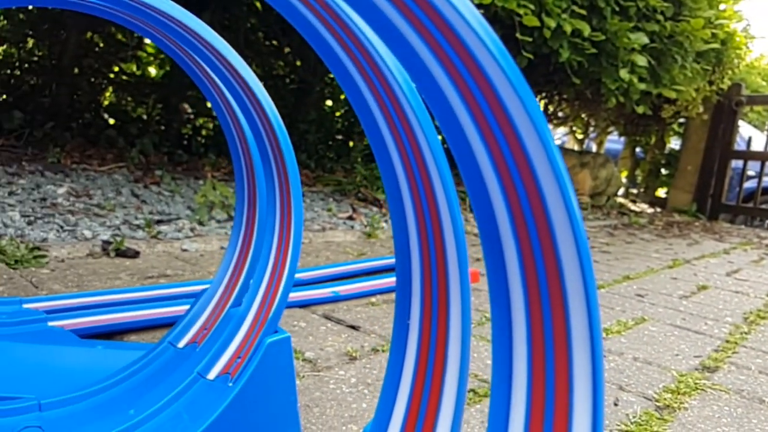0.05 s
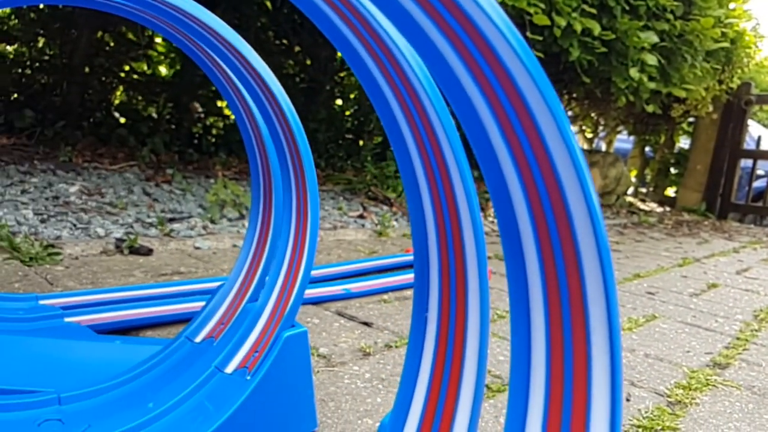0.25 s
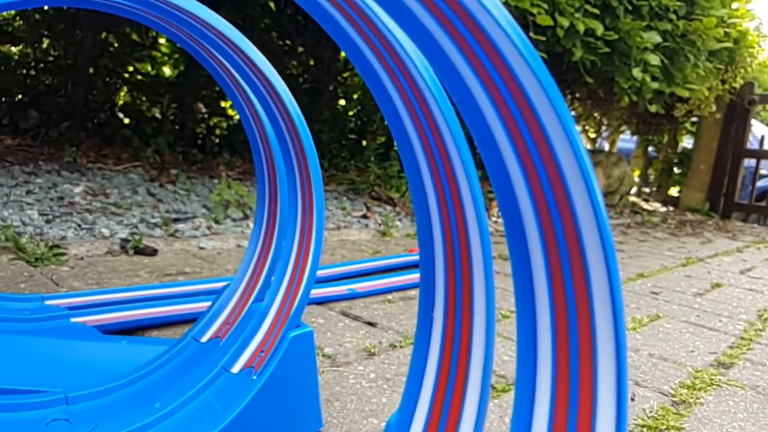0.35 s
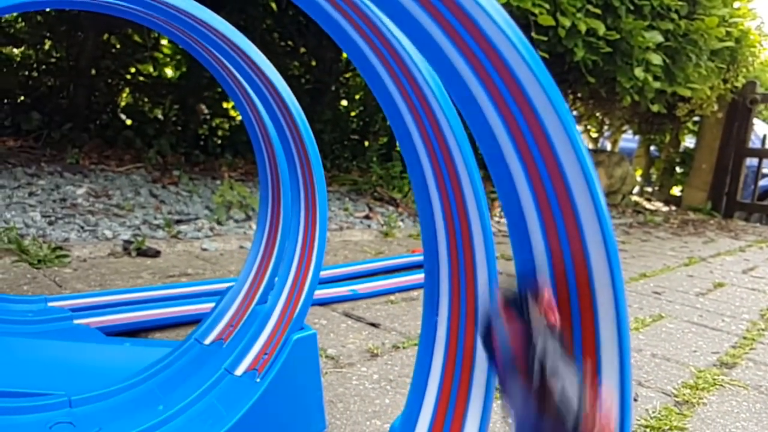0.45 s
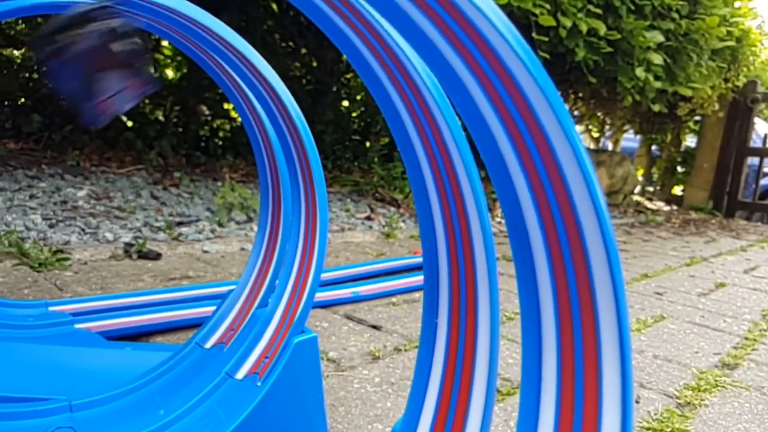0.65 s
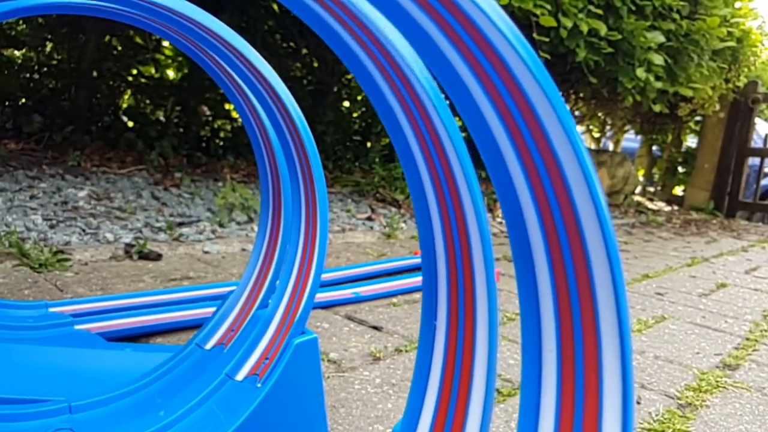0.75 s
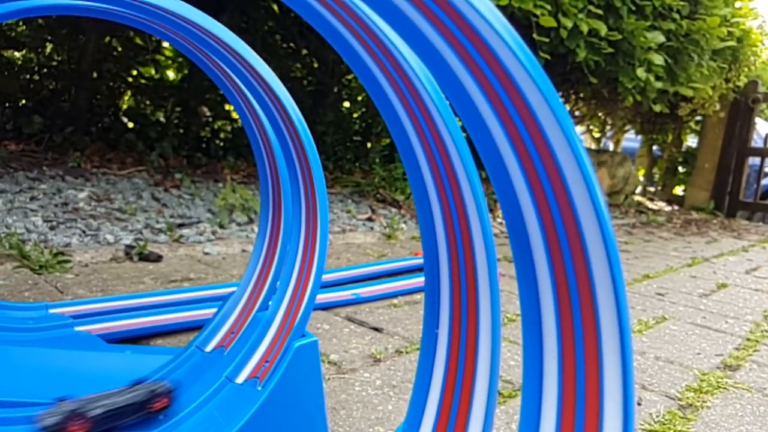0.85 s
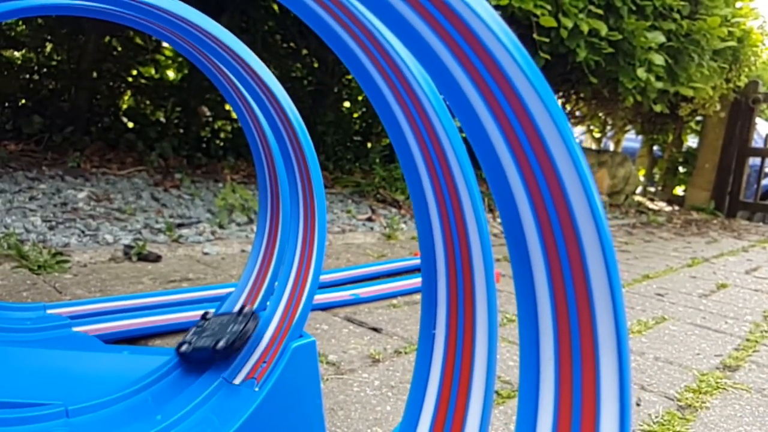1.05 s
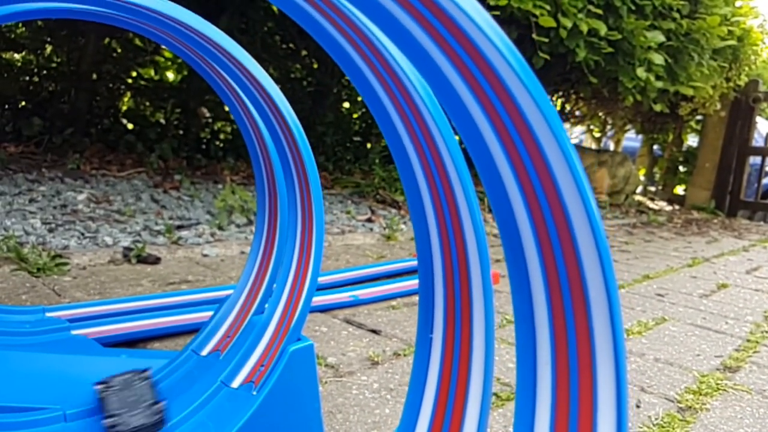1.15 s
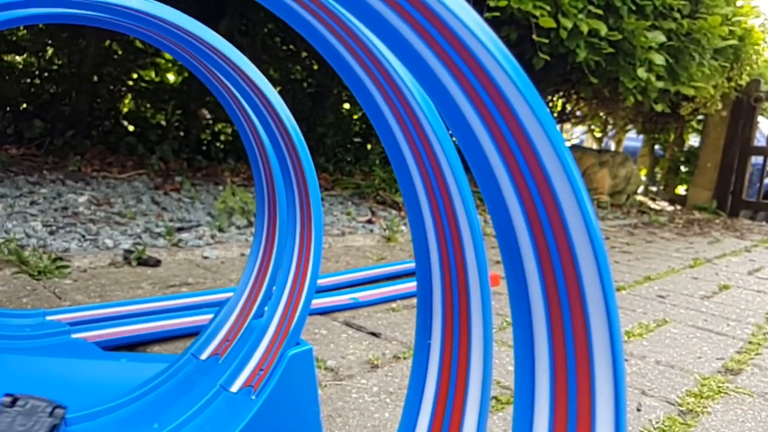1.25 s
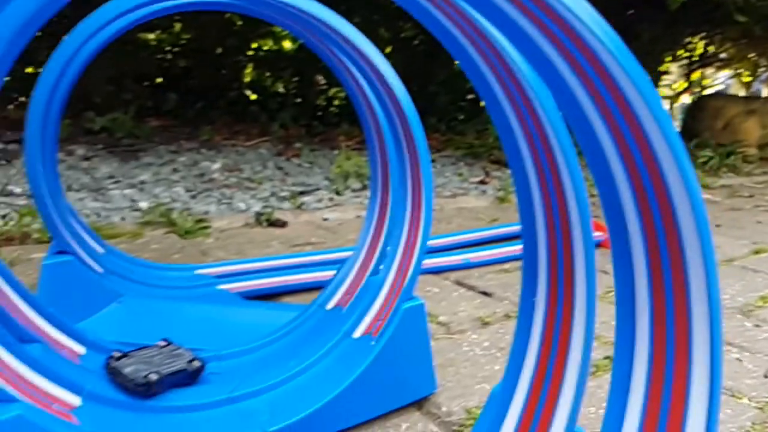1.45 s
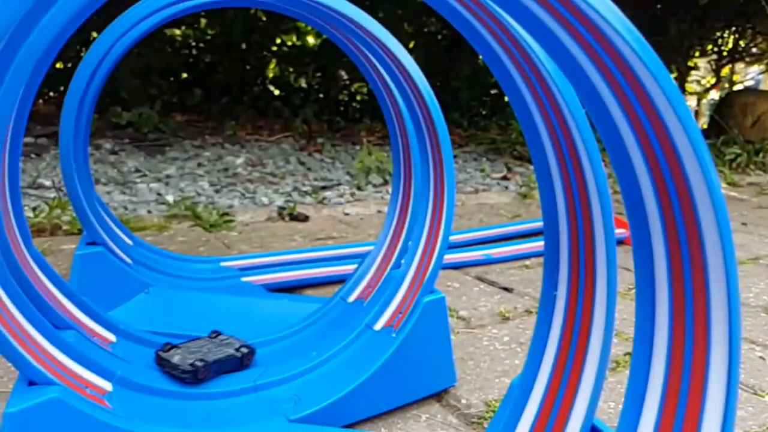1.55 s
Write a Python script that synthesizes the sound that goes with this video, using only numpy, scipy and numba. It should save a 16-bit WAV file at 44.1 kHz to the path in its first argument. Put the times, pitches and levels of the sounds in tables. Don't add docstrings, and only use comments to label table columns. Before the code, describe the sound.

Small metal toy car rattling hard on plastic track outdoors, two bursts of clatter, brief bird chirp first

```python
import sys
import numpy as np
from scipy import signal
from scipy.fft import rfft, irfft
from scipy.io import wavfile
from scipy.ndimage import uniform_filter1d
from numba import njit

SR = 44100
rng = np.random.default_rng(int(sys.argv[2]) if len(sys.argv) > 2 else 0)


def int16_out(signal):
    q = np.round(np.clip(np.atleast_2d(signal).T, -1, 1) * 32767)
    wavfile.write(sys.argv[1], SR, q.astype(np.int16))


def invert_db(x):
    u = np.asarray(x, float) / 20
    return 10 ** u


N = 70560

# frequency in Hz, level in dB per Hz.
GARDEN_SPECTRUM = [(15, -31), (25, -11), (166, -5.5), (317, -20.5), (1560, -25), (1740, -30.5), (4030, -18),
                   (6380, -38.5), (16000, -40)]
# start in seconds, length in seconds, from Hz, to Hz, level in dB.
CHIRPS = [
    (.008, 0.02, 5700, 6070, -56),
    (0.014, 0.042, 3140, 4700, -46),
    (0.044, .035, 4560, 3300, -44.5),
    (.048, 0.056, 3916, 3700, -50),
    (0.062, 0.062, 2594, 3200, -48),
    (0.077, .025, 4750, 4700, -70),
]
# time in seconds, level in dB, track thump in dB, crack in dB, body ring in Hz.
LOOP_KNOCKS = [(0.1435, -40, -11.5, -12, 2630), (0.2186, -33.5, -7, 0, 2600), (0.2467, -11, -21, -24, 2020),
               (0.2803, -21, -22, -1, 2700), (0.3341, -8.5, -15, -12, 3640), (0.3413, -9.5, -33, -38, 2340),
               (0.4355, -13.5, -7.5, -1.5, 1640), (0.468, -26, 3.5, 3, 2240), (0.4767, -6, -27, -5, 3420),
               (0.4901, -15.5, -14, -20, 2800), (0.5034, -13, -7.5, -5, 3440), (0.5212, -16, -4, 4.5, 2240),
               (0.5389, -24, -19, 8, 3600), (0.5629, -26.5, 4, -31, 2470), (0.5771, -21, -16, 0, 3900),
               (0.5888, -18.5, -17, -2, 4760)]
# time in seconds, level in dB, thump in dB, crack in dB, ring in Hz.
LOOP_SCRAPES = [
    (0.3114, -19, -25, -29, 4440),
    (0.364, -19.5, -12, -5, 3570),
    (0.391, -22, -24, -23, 4230),
    (0.395, -25.5, -36, -21, 4200),
    (0.4104, -19, -18, -29, 4500),
    (0.4218, -11, -17, -20, 3700),
]
# time in seconds, level in dB, thump in dB, crack in dB, ring in Hz.
CRASH_KNOCKS = [(0.7915, -12, -5, -5, 1214), (0.818, -14, -18, -1, 2550), (0.8281, -11.5, -39, -7, 2640),
                (0.8442, -26, -14, -21, 2440), (0.852, -14.5, -8, -29, 2520),
                (0.8744, -9.5, -6.5, -8, 2400), (0.8869, -11.5, -3.5, -12, 1715),
                (0.9034, -28.5, -0.5, -25, 1420), (0.9222, -18.5, 0, -15, 3070),
                (0.9323, -15, -5.5, -7.5, 2010), (0.9531, -23.5, -1.5, -41, 1150),
                (0.9941, -48.5, 5, -15, 1415), (1.0101, -35, -13.5, 1, 2480)]
# time in seconds, level in dB, thump in dB, crack in dB, ring in Hz.
SETTLE_KNOCKS = [(1.0932, -42.5, 0.5, 8.5, 2470), (1.1214, -47.5, 4, 3, 4170), (1.1347, -35, 9, -2, 4200),
                 (1.171, -15.5, -7, -22, 2350), (1.1823, -20, 0, -37, 2140), (1.1946, -23, -1.5, -18, 4200),
                 (1.2234, -19.5, -4.5, -25, 2350), (1.2354, -29, -6, -5, 4060), (1.276, -20, -6, -32, 2470),
                 (1.3111, -29, -1, -22, 2400), (1.3646, -28, -1, -23, 1700), (1.3878, -41.5, -14, -6, 2480),
                 (1.412, -66.5, 22.5, -17, 1650), (1.458, -39, 5, -34, 2500),
                 (1.5102, -52.5, 15, -24, 2280), (1.527, -37.5, -0.5, -26, 2340)]
# frequency in Hz, level in dB, t60 in seconds.
TRACK_MODES = [(253, -18.5, 0.076), (440, -19.5, 0.12), (539.6, -4.5, 0.1), (666.4, -7.5, 0.12),
               (738.4, 5.5, 0.056), (813.6, 6.5, 0.021), (1012, -1.5, 0.01), (1270, 3.5, 0.012),
               (1656, -2, 0.059)]
# frequency in Hz, level in dB, t60 in seconds.
BODY_MODES = [(1935, 12.5, 0.0067), (2400, 6.5, .03), (2520, 12, 0.063), (2935, 1.5, 0.12),
              (3200, -0.5, 0.074), (3461, 5.5, 0.033), (3700, -1, 0.24), (4200, 7.5, 0.061),
              (4800, -30, 0.022), (5400, -13, 0.03), (6750, 1, .03)]
# frequency in Hz, level in dB.
CRACK_SPECTRUM = [(1500, 0), (4000, 6), (6000, 2.5), (9000, -3), (12500, -4), (16000, -13)]
# time in seconds, level in dB, share shaking the track in dB, brightest at Hz.
CHATTER = [(0.184, -52.5, -11, 2230), (0.219, -37.5, -10, 2550), (0.328, -28, -17, 4100),
           (0.411, -21, -19, 5000), (0.451, -26, -4.5, 3400), (.54, -26.5, -16.5, 3300),
           (.6, -62.5, 16, 3000), (0.633, -55.5, -11, 3800), (0.699, -48, -25, 3900),
           (.785, -56.5, -27, 3700), (0.831, -48.5, 17.5, 2600), (.95, -41, -17, 2580), (1.0, -52, 8, 2600),
           (1.08, -59.5, -26, 3000), (1.165, -60, -4, 3500), (1.188, -35, -0.5, 3100),
           (1.33, -43.5, 2.5, 3000), (1.6, -58, 2.5, 2600)]
# frequency in Hz, left minus right in dB.
PORT_BALANCE = [(60, -4), (110, 3.5), (200, 3.5), (380, 3.0), (700, 3.5), (1290, 1), (2380, -5.5),
                (4400, -3.5), (8120, 1.0), (15000, 9.5)]

GARDEN_DB = -57
CHIRP_ROUGH_DB, CHIRP_WIDTH_HZ, HEDGE_DB = 2, 870, -2
CONTACT_S, THUMP_S, CRACK_S, SHAKE_S = 0.0021, 0.00016, 0.0029, 0.0077
RISE_S, SCRAPE_S, TAIL_S, TAIL_DB = 0.00048, 0.0043, 0.013, -16
RING_Q, RING_DB, BODY_DB, THUMP_DB, CRACK_DB, SHAKE_DB = 8.3, -3.5, -13.5, -1, -1, -2
CHATTER_PER_S, CHATTER_SPREAD_DB, CHATTER_WALK_DB = 4500, 1, 3.5
ROLL_Q, ROLL_DB, CHATTER_HISS_DB, HISS_DB_PER_OCTAVE = 3.23, -3, -8.5, 9.5
RUMBLE_DB, ECHO_T60_S, ECHO_DB = -21.5, 0.17, -17
LEFT_LEAD_S, ALIKE_BELOW_HZ, TOP_HZ = 0.00021, 2330, 16000


def curve(points, hz):
    p = np.array(points, float)
    return np.interp(np.log(np.maximum(hz, 1)), np.log(np.maximum(p[:, 0], 1)), p[:, 1])


def colour(x, points):
    hz = np.arange(N // 2 + 1) * SR / N
    y = irfft(rfft(x) * invert_db(curve(points, hz)), N)
    return y / y.std()


def pair():
    hz = np.arange(N // 2 + 1) * SR / N
    apart = np.clip(hz / ALIKE_BELOW_HZ, 0, 1) ** 2
    mid, side = rfft(rng.standard_normal((2, N)))
    both = mid + apart * side * np.array([[1], [-1]])
    return irfft(both / np.sqrt(1 + apart ** 2), N)


def walk(rate_hz):
    k = int(SR / rate_hz)
    w = uniform_filter1d(np.repeat(rng.standard_normal(N // k + 1), k), k)[:N]
    return w / w.std()


def fade(x, tau_s):
    return signal.lfilter([1], [1, -np.exp(-1 / (tau_s * SR))], x)


def above(x, hz):
    return signal.sosfilt(signal.butter(2, hz, "high", fs=SR, output="sos"), x)


def modes(x, table):
    out, power = 0, 0
    for hz, db, t60_s in table:
        r = np.exp(-np.log(1000) / (t60_s * SR))
        gain = invert_db(db) * np.sqrt(1 - r) * 2
        poles = [1, -2 * r * np.cos(2 * np.pi * hz / SR), r * r]
        out = out + gain * signal.lfilter([.5, 0, -.5], poles, x)
        power += invert_db(db) ** 2
    return out / np.sqrt(power)


@njit
def moving_band(x, hz, q):
    y, band, low = np.empty(len(x)), 0., 0.
    for i in range(len(x)):
        g = np.tan(np.pi * hz[i] / SR)
        v = (band + g * (x[i] - low)) / (1 + g * (g + 1 / q))
        band, low, y[i] = 2 * v - band, low + 2 * g * v, v / q
    return y


def echo(x, t60_s):
    late_s = np.arange(SR // 4) / SR
    tail = rng.standard_normal((2, len(late_s))) * invert_db(-60 * late_s / t60_s) * (late_s > .004)
    tail = tail / np.sqrt(np.sum(tail[0] ** 2))
    return signal.fftconvolve(x * np.ones((2, 1)), tail, axes=1)[:, :N]


def garden():
    return invert_db(GARDEN_DB + .8 * walk(6)) * colour(pair(), GARDEN_SPECTRUM)


def bird(t):
    notes = 0
    for start_s, length_s, from_hz, to_hz, db in CHIRPS:
        u = np.clip((t - start_s) / length_s, 0, 1)
        hoarse = 1 + invert_db(CHIRP_ROUGH_DB) * walk(CHIRP_WIDTH_HZ)
        phase = 2 * np.pi * np.cumsum(from_hz + (to_hz - from_hz) * u) / SR
        notes = notes + invert_db(db) * hoarse * np.sin(np.pi * u) * np.sin(phase)
    return notes / 2 + invert_db(HEDGE_DB) * echo(notes, 0.11)


def touch(sharp, drag):
    def envelope(j, tau_s):
        decay = fade(sharp[j], tau_s) + invert_db(TAIL_DB) * fade(sharp[j], TAIL_S)
        return fade(decay, RISE_S) / (RISE_S * SR) + drag[j]
    return envelope(0, CONTACT_S), envelope(2, CRACK_S)


def body_ring(contact, ring_hz):
    ring = np.array([moving_band(c, ring_hz, RING_Q) for c in contact])
    return ring * np.sqrt(SR * RING_Q / ring_hz / np.pi)


def track_thump(sharp, drag):
    blow = fade(fade(sharp, THUMP_S), THUMP_S / 2) / 2
    shake = (fade(sharp, SHAKE_S) + drag) * pair()
    return modes(blow + invert_db(SHAKE_DB) * shake, TRACK_MODES)


def knocks():
    hits = list(LOOP_KNOCKS) + list(CRASH_KNOCKS) + list(SETTLE_KNOCKS)
    rows = np.array(hits + list(LOOP_SCRAPES), float)
    at = (rows[:, 0] * SR).astype(int)
    size = invert_db(rows[:, 1] + np.array([0 * at, rows[:, 2], rows[:, 3]]))
    sharp, slow = np.zeros((2, 3, N))
    k = len(hits)
    sharp[:, at[:k]] = size[:, :k]
    slow[:, at[k:]] = size[:, k:]
    drag = fade(fade(slow, SCRAPE_S), SCRAPE_S / 2) / (SCRAPE_S * SR / 4)

    order = np.argsort(at)
    latest = np.searchsorted(at[order], np.arange(N), side="right") - 1
    ring_hz = rows[order[np.clip(latest, 0, None)], 4]

    body_touch, crack_touch = touch(sharp, drag)
    contact = body_touch * pair()
    metal = invert_db(RING_DB) * body_ring(contact, ring_hz) + invert_db(BODY_DB) * modes(contact, BODY_MODES)
    crack = crack_touch * colour(pair(), CRACK_SPECTRUM)
    thump = track_thump(sharp[1], drag[1])
    return above(metal + invert_db(CRACK_DB) * crack, 650) + invert_db(THUMP_DB) * thump, thump


def chatter(t):
    at_s, level_db, track_db, bright_hz = np.array(CHATTER, float).T
    chance = rng.random((2, N))
    size_db = np.minimum(-CHATTER_SPREAD_DB * np.log(chance[1]), 12)
    clicks = fade((chance[0] < CHATTER_PER_S / SR) * invert_db(size_db), 0.00072)
    clicks = clicks / np.sqrt(np.mean(clicks ** 2))
    force_db = np.interp(t, at_s, level_db, left=-90) + CHATTER_WALK_DB * np.tanh(walk(70))
    force = clicks * invert_db(force_db)

    track = modes(force * invert_db(np.interp(t, at_s, track_db)) * pair(), TRACK_MODES)
    scrape = force * pair()
    body = modes(scrape, BODY_MODES) + 2 * invert_db(ROLL_DB) * scrape
    centre_hz = np.interp(t, at_s, bright_hz)
    roll = np.array([moving_band(x, centre_hz, ROLL_Q) for x in body])
    hiss_db = CHATTER_HISS_DB + HISS_DB_PER_OCTAVE * np.log2(centre_hz / 3000)
    hiss = invert_db(hiss_db) * force * colour(pair(), CRACK_SPECTRUM)
    return above(roll + hiss, 720) + track


def base_rumble(thump):
    band = signal.butter(2, [90, 300], "band", fs=SR, output="sos")
    return invert_db(RUMBLE_DB) * signal.sosfilt(band, np.abs(thump))


def scene():
    t = np.arange(N) / SR
    hits, thump = knocks()
    car = above(hits + chatter(t), 178) + base_rumble(thump)
    return garden() + bird(t) + car + invert_db(ECHO_DB) * echo(car, ECHO_T60_S)


def low_pass(x):
    return signal.sosfilt(signal.butter(12, 16990, fs=SR, output="sos"), x)


def record(dry):
    hz = np.arange(N // 2 + 1) * SR / N
    half = invert_db(curve(PORT_BALANCE, hz) / 2) * np.exp(1j * np.pi * hz * LEFT_LEAD_S)
    dull = signal.sosfilt(signal.ellip(8, .2, 60, TOP_HZ, fs=SR, output="sos"), dry)
    mix = irfft(rfft(dull) * np.array([half, 1 / half]), N)
    return low_pass(mix)


dry = scene()
out = record(dry)
int16_out(out)
```